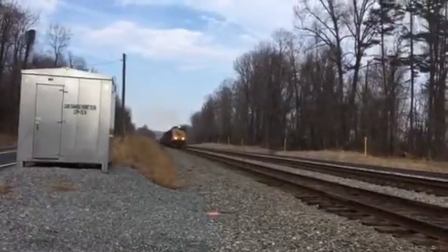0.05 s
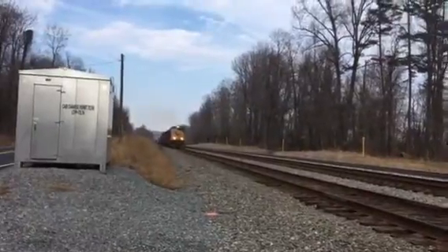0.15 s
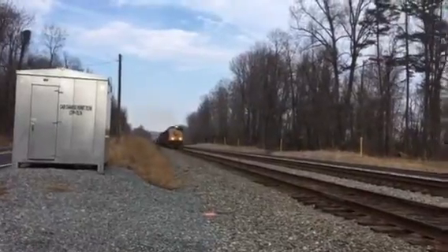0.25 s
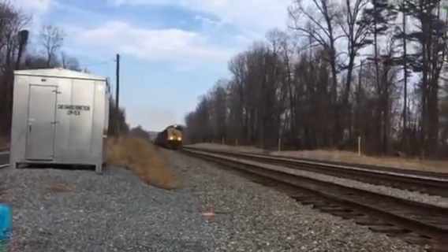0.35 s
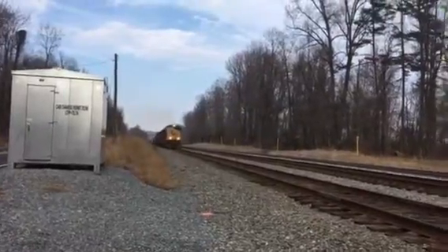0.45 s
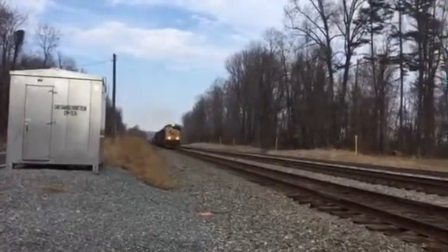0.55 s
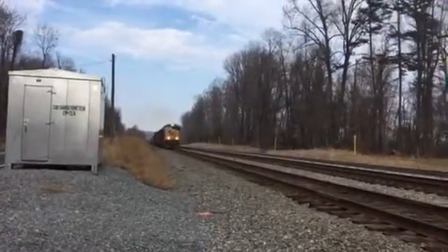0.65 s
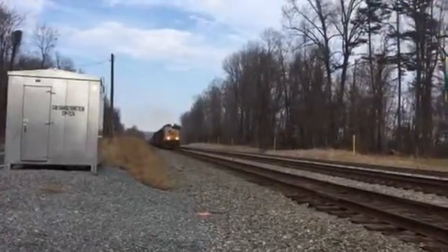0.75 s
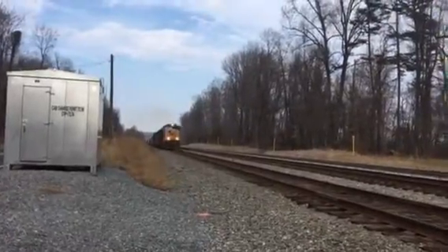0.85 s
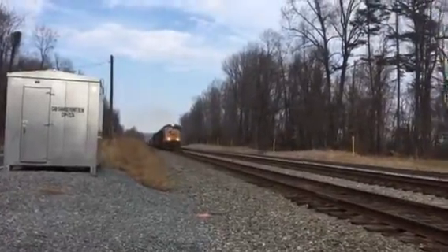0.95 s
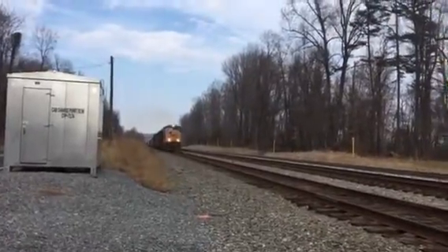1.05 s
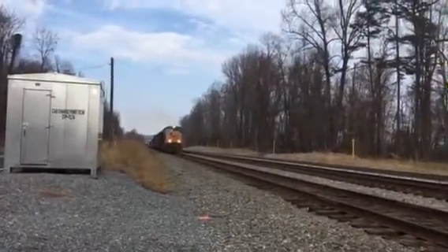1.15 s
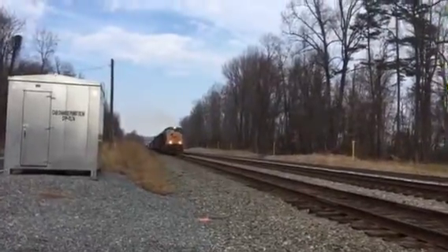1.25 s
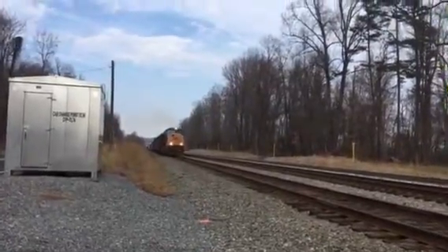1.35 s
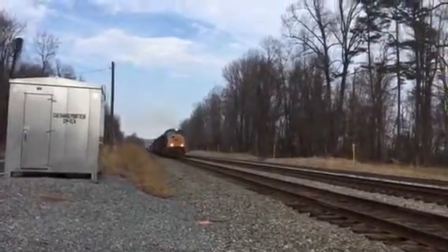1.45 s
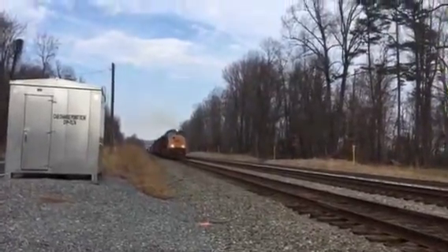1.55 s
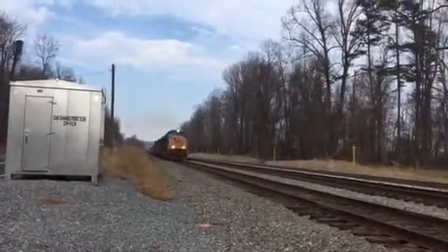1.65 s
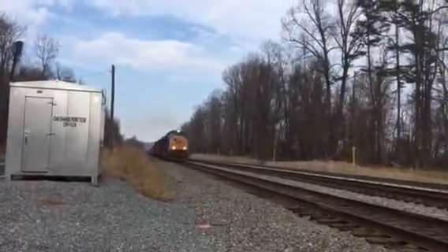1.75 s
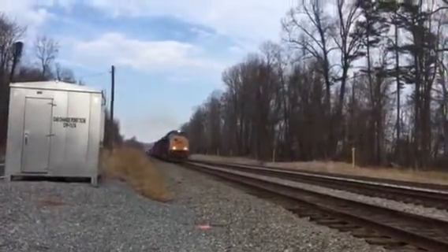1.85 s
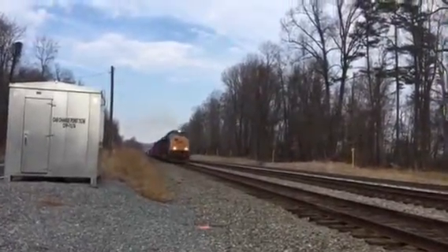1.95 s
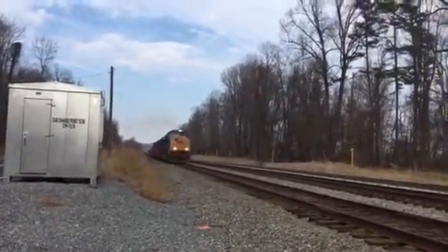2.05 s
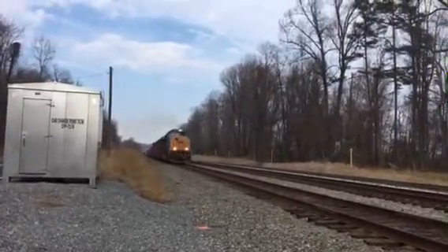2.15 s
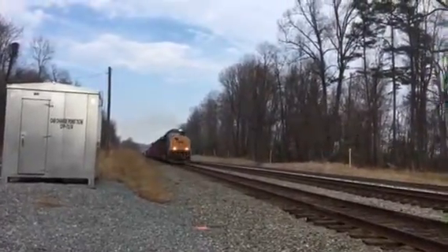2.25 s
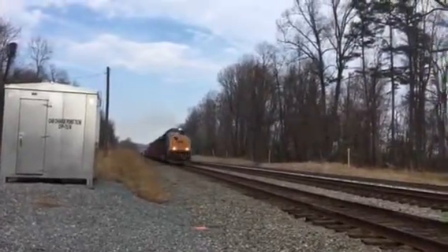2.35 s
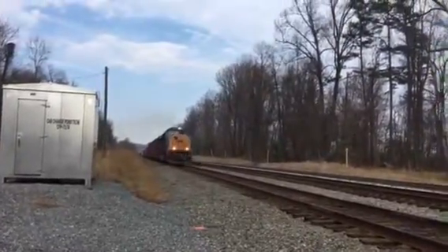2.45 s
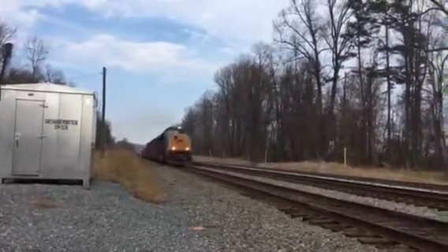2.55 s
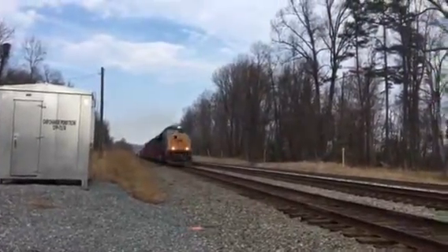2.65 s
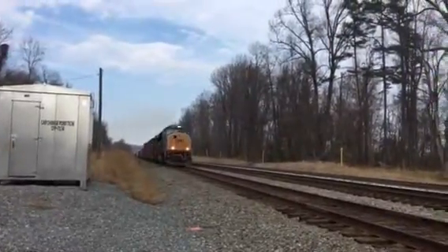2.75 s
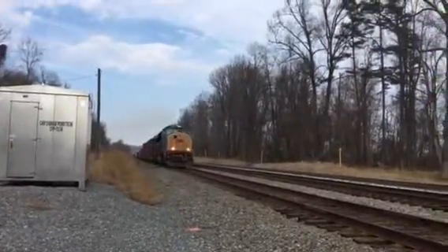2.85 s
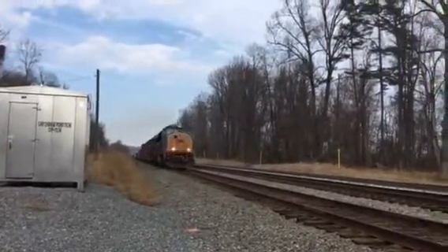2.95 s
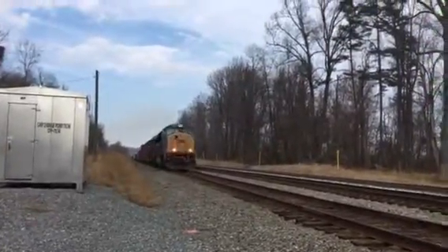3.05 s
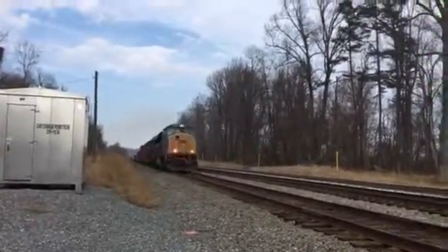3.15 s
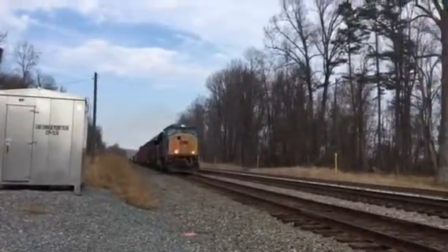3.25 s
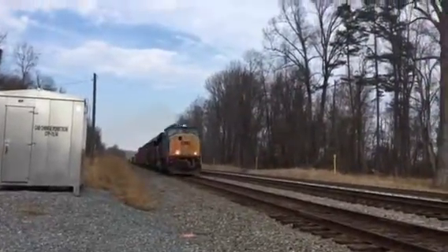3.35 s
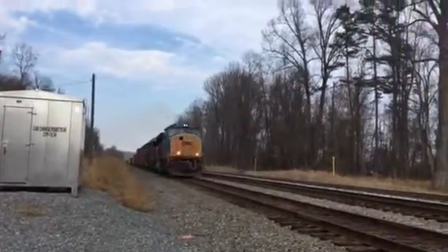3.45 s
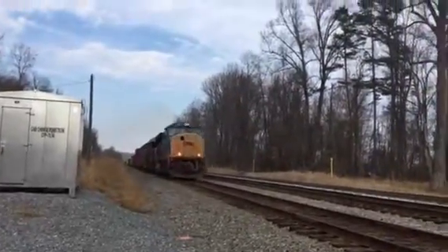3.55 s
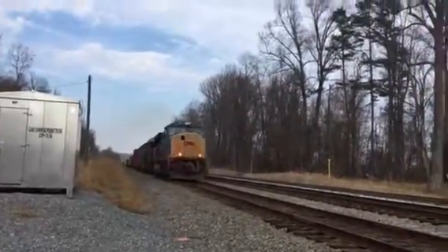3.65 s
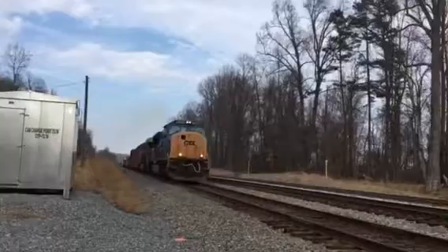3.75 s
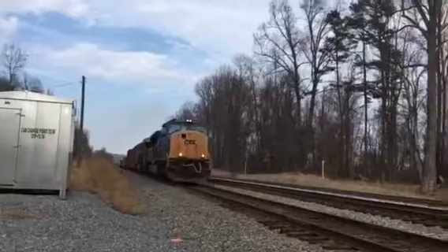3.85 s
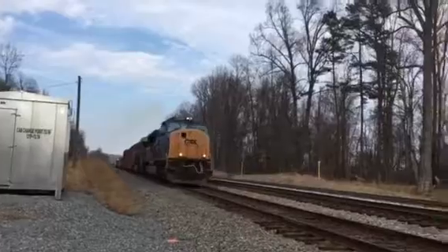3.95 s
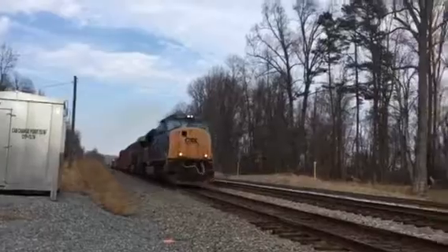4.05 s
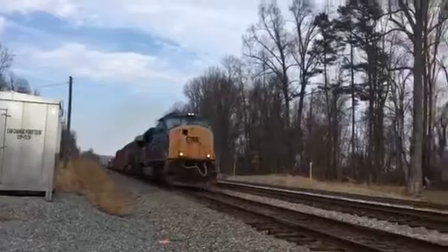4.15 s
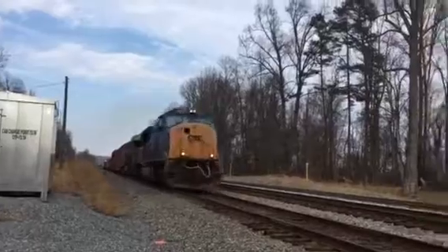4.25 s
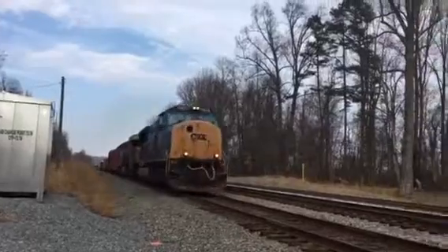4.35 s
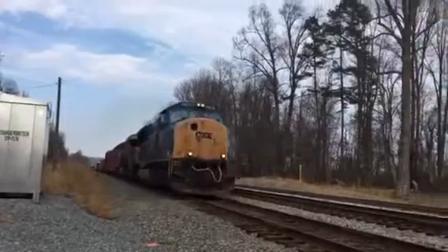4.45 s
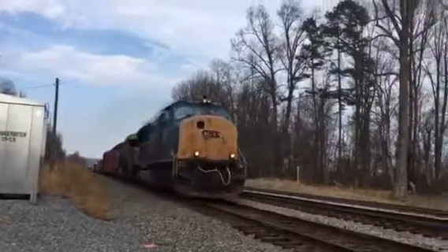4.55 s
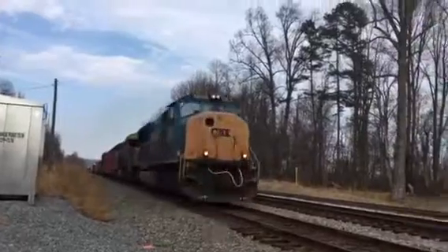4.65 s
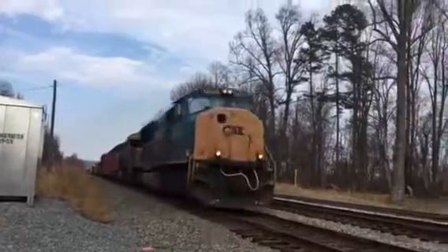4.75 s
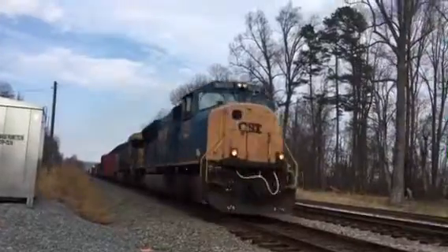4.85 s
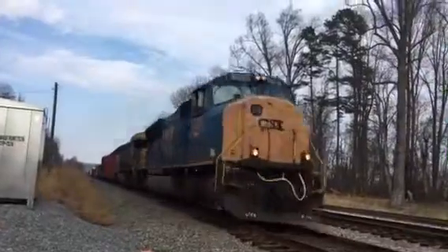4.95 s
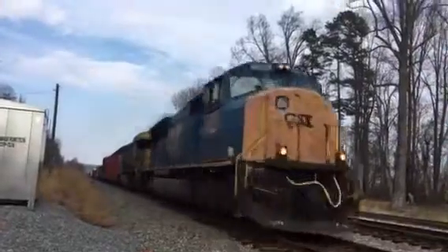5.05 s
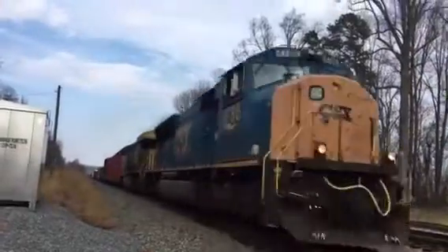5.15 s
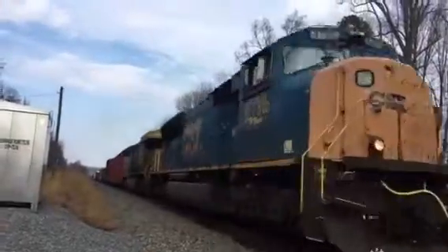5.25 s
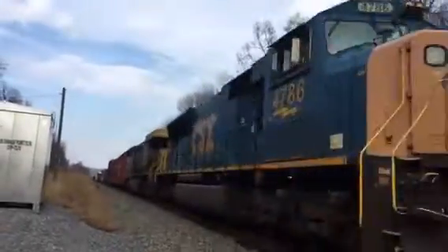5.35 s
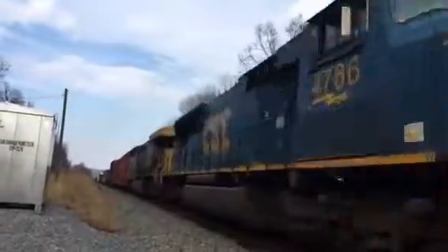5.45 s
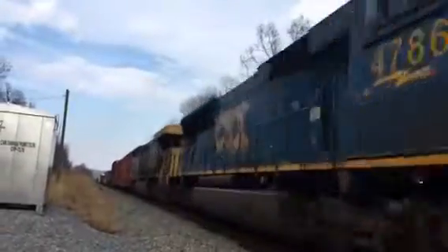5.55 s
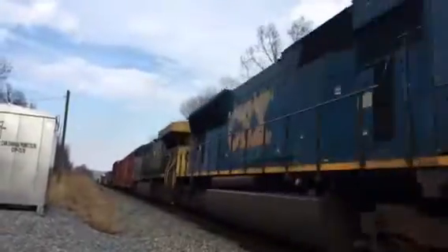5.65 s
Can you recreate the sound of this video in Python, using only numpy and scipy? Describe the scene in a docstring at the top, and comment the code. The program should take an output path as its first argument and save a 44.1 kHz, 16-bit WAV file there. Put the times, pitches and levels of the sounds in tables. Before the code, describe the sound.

Outdoors beside a wooded railway, two diesel locomotives approach with a freight train. A deep throbbing drone and fluttering mid-pitched whines swell and sink over steady rail hiss, with blurred echoes from the trees. The engines grow steadily louder and the hiss brighter. In the last half second, wheels roar close by, with steel scuffs, rattles and a few hard knocks. One fixed trackside microphone, mono, with slightly rounded loud peaks.

```python
"""Two throbbing, whining diesel locomotives run up a wooded line with a freight train and reach the trackside.
A two-stroke leads and a four-stroke follows: each exhaust is a set of sines on multiples of one rotation.
Blower, gears and fans are shaken tones, and the woods scatter tones into bands of noise at lower pitches.
The wheel roar is shaped noise that brightens as the air path shrinks, over a low rumble of wagons.
At the end steel scuffs and knocks close by, and the first wheels shudder over the sleepers."""
import sys
import numpy as np
from scipy import signal
from scipy.fft import rfft, irfft, next_fast_len
from scipy.io import wavfile

SR = 44100
rng = np.random.default_rng(int(sys.argv[2]) if len(sys.argv) > 2 else 0)


def store_wav(level_fs):
    """Save 16-bit WAV to argv[1]."""
    pcm = np.round(np.clip(np.atleast_2d(level_fs), -1, 1) * 32767)
    wavfile.write(sys.argv[1], SR, pcm.T.astype(np.int16))


N = 250929


def from_db(db):
    """Decibels to gain."""
    return 10 ** (np.asarray(db) / 20)


def rms_one(x):
    """Scale to unit rms."""
    return x / np.sqrt(np.mean(np.abs(x) ** 2) + 1e-20)


def in_time(rows):
    """A curve of (time, value) rows, read at every sample."""
    s, values = np.transpose(rows)
    return np.interp(np.arange(N) / SR, s, values)


def at_hz(points, hz):
    """A spectrum in dB, read on a log-frequency axis."""
    knots, db = np.transpose(points)
    return np.interp(np.log(hz + 1), np.log(knots), db)


def noise(gain_at):
    """Unit-rms noise whose spectrum follows a gain function of frequency."""
    size = next_fast_len(N)
    hz = np.arange(size // 2 + 1) * SR / size
    spectrum = rfft(rng.standard_normal(size)) * gain_at(hz)
    return rms_one(irfft(spectrum, size)[:N])


def drift(rate_hz):
    """Slow chance of spread 1, its turns mostly slower than rate_hz."""
    return noise(lambda hz: np.exp(-(hz / rate_hz) ** 2 / 2) * (hz > 0))


def turning(rate_hz, wander):
    """Phase in radians of a shaft whose speed wanders by a small share."""
    turns = np.cumsum(rate_hz * (1 + wander * drift(1.74))) / SR
    return 2 * np.pi * (turns + rng.random())


# The nose draws level with the listener at ARRIVAL_S; MIDDLE_M is the middle distance for levels.
SPEED_M_PER_S, TRACK_M, MIDDLE_M, ARRIVAL_S = 20, 5, 50, 5.56


def distance_m(behind_m, t=None):
    """Distance to a point behind the nose, at every sample or at the times t."""
    t = np.arange(N) / SR if t is None else t
    along_track_m = SPEED_M_PER_S * (ARRIVAL_S - t) + behind_m
    return np.hypot(along_track_m, TRACK_M)


def approach_db(growth):
    """A source gains a fixed number of decibels each time its distance halves."""
    middle_db, per_halving_db, behind_m = growth
    return middle_db + per_halving_db * np.log2(MIDDLE_M / distance_m(behind_m))


OPENING_S, OPENING_RISE_S = 5.2, 0.054


def opening(t=None):
    """From 0 to 1 as the first wheels come out from behind the plough."""
    t = np.arange(N) / SR if t is None else t
    return (1 + np.tanh((t - OPENING_S) / (2 * OPENING_RISE_S))) / 2


# Change in the exhaust lines above UPPER_EXHAUST_HZ: time_s, gain_db
UPPER_EXHAUST_GAIN = [(0.0, -5), (1.3, -3.5), (2.8, 2.5), (4.0, 3), (4.7, -0.5), (5.4, 2), (5.69, -1)]
UPPER_EXHAUST_HZ = 165


def engine(phase, rotation_hz, orders, behind_m, fading_db):
    """Exhaust lines on multiples of one rotation grow with nearness; echoes make each fade in and out."""
    out = np.zeros(N)
    for order, middle_db, per_halving_db in orders:
        level_db = approach_db((middle_db, per_halving_db, behind_m))
        level_db = level_db + fading_db * drift(0.65)
        if order > UPPER_EXHAUST_HZ / rotation_hz:
            level_db = level_db + in_time(UPPER_EXHAUST_GAIN)
        start_phase = 2 * np.pi * rng.random()
        out += from_db(level_db) * np.sin(round(order) * phase + start_phase)
    return np.sqrt(2) * out  # each unfaded line has its level as rms


# Firing note of the leading two-stroke: time_s, level_db
FIRING_LEVEL = [(0.0, -38), (0.6, -35.5), (1.4, -33), (2.0, -37), (2.6, -29), (3.2, -31.5), (3.85, -23),
                (4.3, -23), (4.65, -20), (5.15, -22.5), (5.69, -24.5)]
# Its other exhaust lines: multiple_of_crank_rate, level_db at middle distance, gain_db per halving of distance
LEAD_ORDERS = [(4, -41, 3.5), (5, -32, 2.9), (6, -34.5, 4), (7, -39.5, 6), (9, -33.5, 4.5), (10, -36, 3),
               (11, -40, 3.5), (12, -48, 6.5), (13, -41, 4.5), (15, -49.5, 6.5), (16, -49, 6),
               (22, -57.5, 7.5)]
CRANK_HZ, FIRING_ORDER, LEAD_STACK_M = 15.83, 8, 10


def leading_exhaust():
    """A firm firing note and the throbbing lines around it share one crank."""
    crank = turning(CRANK_HZ, wander=.001)
    firing = from_db(in_time(FIRING_LEVEL)) * rms_one(np.sin(FIRING_ORDER * crank))
    return firing + engine(crank, CRANK_HZ, LEAD_ORDERS, LEAD_STACK_M, fading_db=1.5)


# Trailing four-stroke: multiple_of_cycle_rate, level_db at middle distance, gain_db per halving of distance
TRAILING_ORDERS = [(5, -32.5, 2.5), (6, -35.5, 5), (7, -38, 4), (8, -37.5, 6), (9, -39, 3.5),
                   (11, -31.5, 8), (12, -38.5, 8.5), (15, -36, 8.5), (20, -36, 7.5)]
TRAILING_CYCLE_HZ, TRAILING_STACK_M = 9.18, 30


def trailing_exhaust():
    """The second engine throbs on multiples of its own slower cycle, further down the train."""
    cycle = turning(TRAILING_CYCLE_HZ, wander=.001)
    return engine(cycle, TRAILING_CYCLE_HZ, TRAILING_ORDERS, TRAILING_STACK_M, fading_db=2.0)


# Turbulent exhaust gas and shaking bodywork, before the gain below: time_s, level_db
RUMBLE_CURVE = [(0.0, -45.5), (1.3, -42), (2.7, -38.5), (4.2, -36.5), (5.1, -29), (5.35, -28), (5.69, -28)]
# Its spectrum: freq_hz, relative_db per Hz
RUMBLE_COLOUR = [(30, -13), (60, 0), (95, 5), (130, 2), (180, -1.5), (230, -6), (320, -7), (450, -13),
                 (900, -51)]
RUMBLE_GAIN_DB = 4.5


def exhaust_rumble():
    """Turbulent gas and shaking bodywork give low noise."""
    level_db = in_time(RUMBLE_CURVE) + RUMBLE_GAIN_DB
    return from_db(level_db) * noise(lambda hz: from_db(at_hz(RUMBLE_COLOUR, hz)))


def whine(pitch_hz, wander, flutter_db):
    """A unit-rms machine tone, shaken in pitch and level by moving air."""
    shaken = turning(pitch_hz * (1 + wander * drift(12)), wander / 2)
    return rms_one(np.sin(shaken) * from_db(flutter_db * drift(15)))


# Blower hum, before the gain below: time_s, level_db
BLOWER_CURVE = [(0.0, -54), (0.15, -55), (0.32, -41), (0.6, -45.5), (0.78, -52), (0.98, -36), (1.55, -45),
                (1.97, -39.5), (2.2, -52), (2.42, -38.5), (3.2, -41.5), (3.5, -37.5), (4.4, -38),
                (4.55, -42), (4.85, -32), (5.69, -38)]
BLOWER_GAIN_DB = 0.46


def blower():
    """The blower hums on one low tone that swells and sinks."""
    return from_db(in_time(BLOWER_CURVE) + BLOWER_GAIN_DB) * whine(332, wander=.003, flutter_db=1.6)


# Low gear whine, before the gain below: time_s, level_db
LOW_GEAR_CURVE = [(0.0, -42), (0.25, -51.5), (0.5, -40), (0.8, -52), (1.25, -38.5), (1.8, -41.5),
                  (2.0, -46), (2.3, -36), (2.7, -45), (3.0, -39), (3.7, -38), (4.0, -44), (4.75, -40),
                  (5.0, -56), (5.69, -40)]
LOW_GEAR_GAIN_DB = -2
# High gear whine: level_db at middle distance, gain_db per halving of distance, behind_nose_m
HIGH_GEAR_GROWTH = (-40, 1.6, 12)
# Swelling and sinking of the high whine and the echoes, as the air carries them: time_s, gain_db
AIR_CARRY = [(0.0, 1), (0.22, -2), (0.75, 0.5), (1.05, -3.5), (1.3, 3.5), (1.58, -0.5), (1.75, 2.5),
             (2.0, -3), (2.25, 1), (2.6, -2), (3.2, 0), (5.69, 0)]


def gears():
    """A low and a high gear tone; the high one grows with nearness and fades with the air."""
    low = whine(663.7, wander=.0022, flutter_db=1.8)
    high = whine(938.5, wander=.008, flutter_db=1.6)
    low_db = in_time(LOW_GEAR_CURVE) + LOW_GEAR_GAIN_DB
    high_db = approach_db(HIGH_GEAR_GROWTH) + in_time(AIR_CARRY)
    return from_db(low_db) * low + from_db(high_db) * high


# Tones of the cooling fans: pitch_hz, relative_db
FAN_TONES = [(375, 2.5), (455, -4), (746, 2.5)]
# Their common level: level_db at middle distance, gain_db per halving of distance, behind_nose_m
FAN_GROWTH = (-55.5, 6.6, 7)


def fans():
    """Cooling fans add fluttering tones that grow as the distance halves."""
    tones = sum(from_db(db) * whine(hz, wander=.002, flutter_db=2.0) for hz, db in FAN_TONES)
    return from_db(approach_db(FAN_GROWTH)) * tones


def scattered(pitch_hz, spread, slope_db):
    """Echoes from trees beside and behind the train lose its Doppler rise and fill a band below the tone."""
    def skirt(hz):
        below = (1 - hz / pitch_hz) / spread  # 0 at the tone, 1 at the foot of the band
        band_edges = 1 / (1 + np.abs(2 * below - 1) ** 10)
        return from_db(slope_db * np.clip(below, 0, 1)) * band_edges
    return noise(skirt)


# Tones that come back from the woods: pitch_hz, relative_db
WOODS_TONES = [(378, -10), (667, -5), (750, -12), (955, -0.5), (1450, -12)]
# Common level of the echoes, before the carry of the air: time_s, level_db
WOODS_CURVE = [(0, -43), (2, -37.5), (3.5, -36), (5, -33), (5.69, -36.5)]


def woods_echoes():
    """The trees return machine tones as bands of noise, swelling and sinking with the air."""
    echoes = sum(from_db(db) * scattered(hz, spread=0.11, slope_db=-3.5) for hz, db in WOODS_TONES)
    return from_db(in_time(WOODS_CURVE) + in_time(AIR_CARRY)) * echoes


# Treble at 10 kHz: its level at middle distance and what nearness and the open running gear add
TREBLE_DB, AIR_DB_PER_M, TREBLE_PER_HALVING_DB, OPEN_TREBLE_DB = -2, 0.156, 0.6, 0.5


def treble_db(t=None):
    """Treble at 10 kHz: less is lost to air and ground as the train nears."""
    metres = distance_m(0, t)
    air_db = AIR_DB_PER_M * (MIDDLE_M - metres)
    halving_db = TREBLE_PER_HALVING_DB * np.log2(MIDDLE_M / metres)
    return TREBLE_DB + air_db + halving_db + OPEN_TREBLE_DB * opening(t)


# Wheels rolling on rail, before the treble change with distance: freq_hz, relative_db per Hz
ROLLING_COLOUR = [(150, 4), (380, 4), (520, 4.5), (800, 2.5), (1200, 6), (1400, 2), (2000, 0), (2600, -3),
                  (3500, -5), (6200, -10.5), (9000, -19.5), (11000, -26.5), (13500, -33), (16000, -31)]
# The rails sing ahead of the train: once that stretch arrives, the roar's base level stops growing with
# nearness, though its treble still brightens and the open running gear adds more.
ROAR_DB, SINGING_RAIL_M, ROAR_LOSS_DB_PER_M, OPEN_ROAR_DB = -25, 46, 0.0366, 6


def rolling():
    """Rail roar: air swallows treble in proportion to frequency, less so as the train nears."""
    hz, t, grain = signal.stft(rng.standard_normal(N), SR, nperseg=1024)
    beyond_m = np.maximum(distance_m(0, t) - SINGING_RAIL_M, 0)
    roar_db = ROAR_DB - ROAR_LOSS_DB_PER_M * beyond_m + OPEN_ROAR_DB * opening(t)
    colour_db = at_hz(ROLLING_COLOUR, hz)[:, None]
    treble_share = np.clip((hz - 1900) / 8100, 0, 1.5)  # 0 up to 1.9 kHz, 1 at 10 kHz
    air_db = np.outer(treble_share, treble_db(t))
    roar = signal.istft(grain * from_db(colour_db + air_db + roar_db), SR)[1][:N]
    return roar * from_db(0.5 * drift(19))


# The long line of wagons shakes the ground: freq_hz, relative_db per Hz
WAGON_COLOUR = [(12, -40), (28, -22), (45, -4.5), (80, 2.5), (110, -1.5), (170, -12), (300, -34),
                (700, -75.5)]
# Its level: level_db at middle distance, gain_db per halving of distance, behind_nose_m
WAGON_GROWTH = (-29, 3.5, 31)


def wagons():
    """The long line of wagons is a low rumble that grows slowly."""
    return from_db(approach_db(WAGON_GROWTH)) * noise(lambda hz: from_db(at_hz(WAGON_COLOUR, hz)))


# Ringing modes of the steel trucks: freq_hz, width_hz, relative_db
TRUCK_MODES = [(246, 41, 10), (490, 120, 5.5), (750, 120, -6), (1140, 250, 10), (1440, 260, 3),
               (1900, 140, 0.5), (3300, 420, -13), (4260, 440, -16), (6300, 1500, -20), (12500, 4800, -4)]
# Rattle, before the opening: level_db at middle distance, gain_db per halving of distance, behind_nose_m
RATTLE_GROWTH = (-57.5, 7.85, 0)
OPEN_RATTLE_DB = 6


def rattle(per_s, spread_db):
    """Dense uneven blows ring briefly in the steel of the trucks."""
    strength_db = spread_db * np.minimum(rng.exponential(1, N), 3)
    blows = (rng.random(N) < per_s / SR) * from_db(strength_db)
    out = np.zeros(N)
    for hz, width_hz, db in TRUCK_MODES:
        r = np.exp(-np.pi * width_hz / SR)
        resonance = [1, -2 * r * np.cos(2 * np.pi * hz / SR), r * r]
        struck = blows * rng.standard_normal(N) + 1e-18
        out += from_db(db) * rms_one(signal.lfilter([1, 0, -1], resonance, struck))
    return from_db(approach_db(RATTLE_GROWTH) + OPEN_RATTLE_DB * opening()) * rms_one(out)


# Wheels scuffing the rail close by:
# start_s, level_db before rise and fade, centre_hz, width_octaves, rise_s, fade_s
SCUFFS = [(4.54, -52, 12300, .12, 0.022, .07), (4.66, -50, 12600, 0.14, .012, .06),
          (4.786, -35.5, 7460, .45, 0.008, 0.066), (4.8, -45, 12500, .15, .012, .04),
          (4.842, -31, 6500, .3, .005, 0.014), (5.14, -26, 11000, 0.49, 0.097, 0.046),
          (5.3, -27, 8500, 0.54, .008, 0.021), (5.365, -20, 3600, 0.22, 0.051, .04),
          (5.405, -14.5, 3530, 0.12, 0.011, 0.014), (5.501, -19.5, 2450, 0.95, 0.024, 0.058),
          (5.572, -22, 7500, 0.45, 0.019, 0.026)]


def scuffs():
    """Short rushes of steel sliding on steel are bands of noise that rise and die away."""
    out = np.zeros(N)
    for start_s, db, centre_hz, octaves, rise_s, fade_s in SCUFFS:
        age = np.maximum(np.arange(N) / SR - start_s, 0)
        rush = noise(lambda hz: np.exp(-(np.log2((hz + 1) / centre_hz) / octaves) ** 2 / 2))
        envelope = (1 - np.exp(-age / rise_s)) * np.exp(-age / fade_s)
        out += from_db(db) * rush * envelope
    return out


SLEEPER_M = .49  # spacing of the beat along the track


def sleeper_beat(depth_db):
    """Close by, the wheels are heard to shudder as they cross each sleeper."""
    beat = np.sin(turning(SPEED_M_PER_S / SLEEPER_M, wander=.02))
    lowering_db = depth_db ** 2 / 10  # a deeper beat is set lower, against its louder peaks
    return from_db(opening() * (depth_db * beat - lowering_db))


# Knocks in the running gear: start_s, peak_db, centre_hz
KNOCKS = [(5.257, -12, 500), (5.314, -15, 350), (5.443, -15, 950), (5.563, -11, 1210)]
KNOCK_DB_PER_OCTAVE = 15


def knocks():
    """Single blows in the running gear; each rings most the truck modes near its own pitch."""
    out = np.zeros(N)
    age = np.arange(SR // 10) / SR
    for start_s, peak_db, centre_hz in KNOCKS:
        blow = np.zeros(len(age))
        for hz, width_hz, mode_db in TRUCK_MODES:
            level_db = mode_db - KNOCK_DB_PER_OCTAVE * abs(np.log2(hz / centre_hz))
            ring = np.sin(2 * np.pi * hz * age) * np.exp(-np.pi * width_hz * age / 2)
            blow += from_db(level_db) * rng.choice([-1, 1]) * ring
        start = int(start_s * SR)
        out[start:start + len(age)] += (from_db(peak_db) * blow / np.abs(blow).max())[:N - start]
    return out


def scene():
    """The whole train, heard from one spot at the trackside."""
    exhausts = leading_exhaust() + trailing_exhaust() + exhaust_rumble()
    machinery = blower() + gears() + fans() + woods_echoes()
    roar = rolling() * sleeper_beat(depth_db=.6)
    trucks = rattle(per_s=550, spread_db=2.8) * sleeper_beat(depth_db=4)
    wheels = roar + trucks + scuffs() + knocks()
    return (exhausts + machinery + wheels + wagons())[None]


# Hollows in the microphone's response: centre_hz, width_hz, gain_db
MICROPHONE_HOLLOWS = [(1184, 132, -4), (2870, 145, -3), (4900, 190, -3.5), (7600, 460, -1.5),
                      (10400, 400, -4)]
CUTOFF_HZ = 15720


def record(dry):
    """The microphone colours the treble and sheds the deepest bass; peaks are rounded and the top is cut."""
    size = next_fast_len(2 * N)
    hz = np.arange(size // 2 + 1) * SR / size
    hollows_db = sum(db * np.exp(-((hz - centre) / width) ** 2) for centre, width, db in MICROPHONE_HOLLOWS)
    coloured = irfft(rfft(dry, size) * from_db(hollows_db), size)[:, :N]
    thinned = signal.sosfilt(signal.butter(4, 24, "high", fs=SR, output="sos"), coloured)
    rounded = 1.57 * np.tanh(thinned / 1.427)
    return signal.sosfilt(signal.ellip(12, .1, 90, CUTOFF_HZ, fs=SR, output="sos"), rounded)


dry = scene()
out = record(dry)
store_wav(out)
```